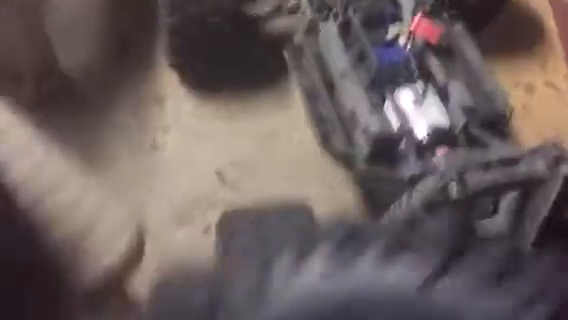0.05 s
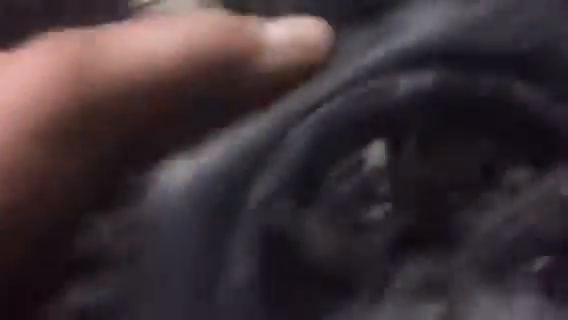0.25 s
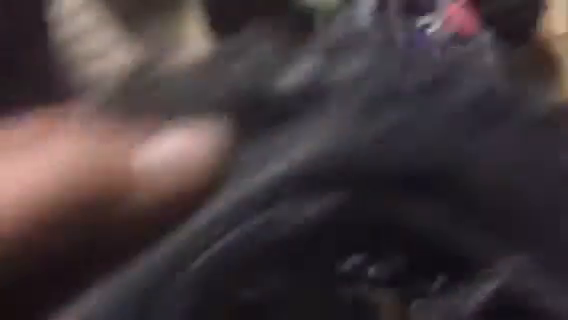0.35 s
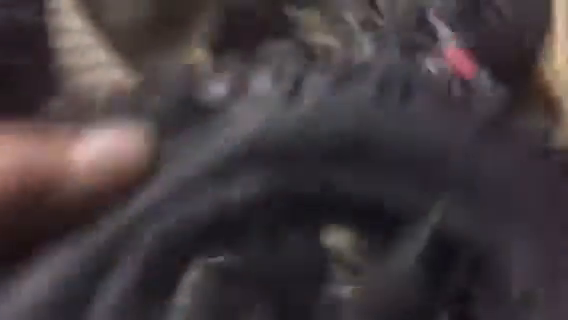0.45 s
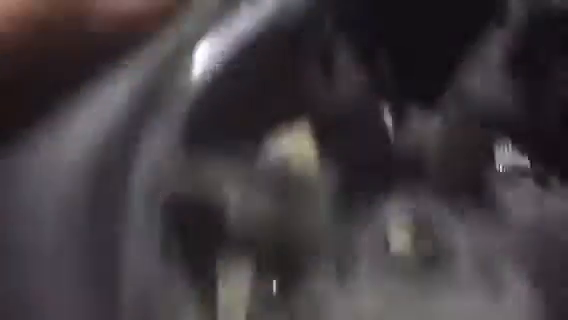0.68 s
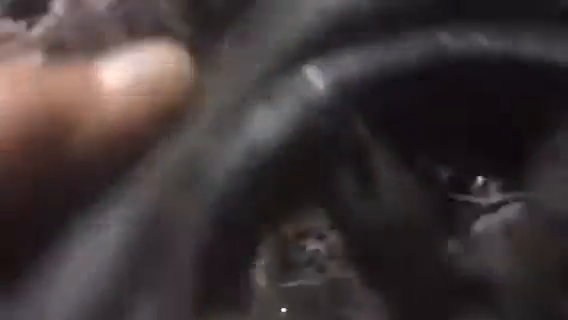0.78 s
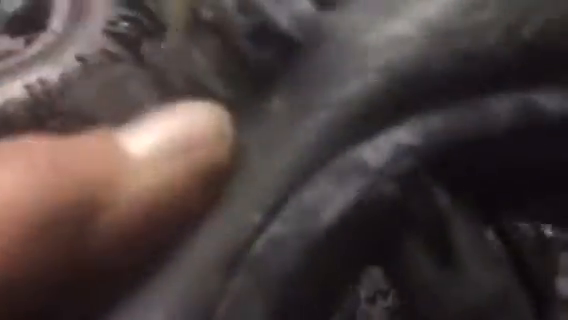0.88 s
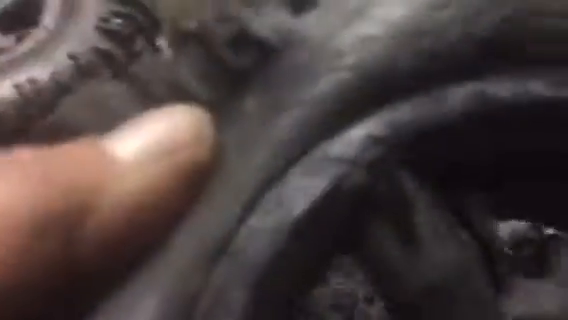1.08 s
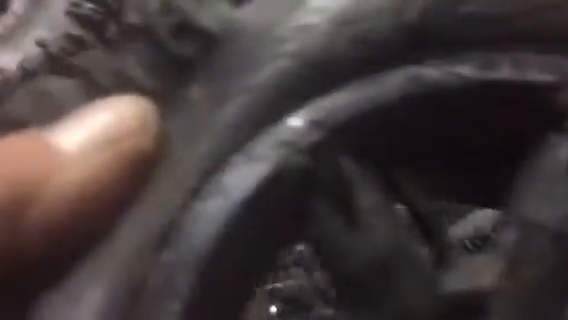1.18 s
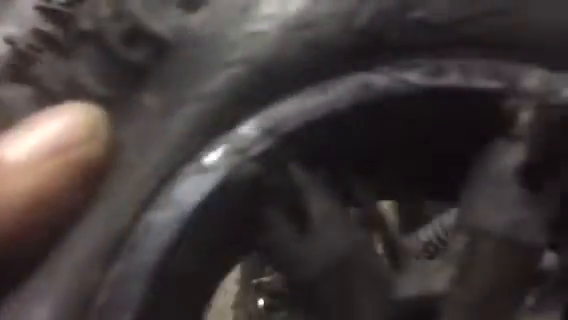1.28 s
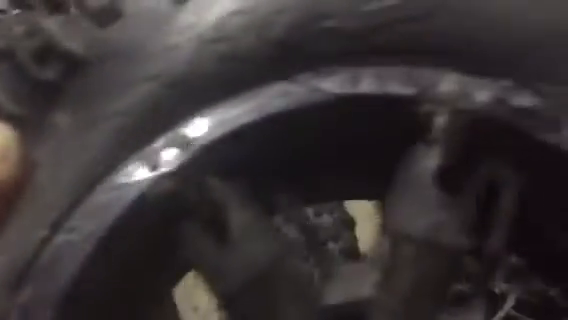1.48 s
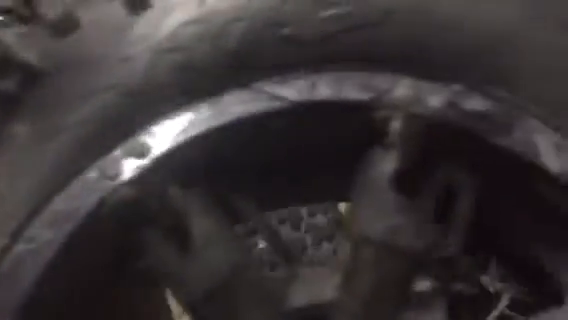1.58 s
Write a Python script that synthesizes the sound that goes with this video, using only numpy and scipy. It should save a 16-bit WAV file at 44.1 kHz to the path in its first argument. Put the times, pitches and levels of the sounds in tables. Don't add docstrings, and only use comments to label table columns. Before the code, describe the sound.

A rubber toy tire on a plastic wheel is turned by hand, close and dry indoors. Faint airy hum and low handling tremble run throughout. A hard, hissy rub with heavy thumps comes at 0.25-0.35 seconds, a lighter double stroke with a hollow knock at 0.5-0.65, a longer rub around 0.7-0.85, and an abrupt scratchy one from 0.9 to 1.1. Then only soft bumps and hum.

```python
import sys
import numpy as np
from scipy import signal
from scipy.fft import rfft, irfft
from scipy.io import wavfile
from scipy.ndimage import uniform_filter1d

SR = 44100
rng = np.random.default_rng(int(sys.argv[2]) if len(sys.argv) > 2 else 0)


def invert_db(level):
    return 10 ** (np.asarray(level, dtype=float) / 20)


def waveform_to_disk(signal):
    frames = np.transpose(np.atleast_2d(signal))
    scaled = np.clip(frames, -1, 1) * 32767
    samples = np.round(scaled).astype(np.int16)
    wavfile.write(sys.argv[1], SR, samples)


N = 72765


def rms_one(x):
    return x / np.sqrt(np.mean(x ** 2) + 1e-20)


def in_time(rows):
    s, *columns = np.transpose(rows)
    return [np.interp(np.arange(N) / SR, s, c) for c in columns]


def drift(rate_hz):
    r = np.exp(-2 * np.pi * rate_hz / SR)
    noise = rng.standard_normal(N + SR)
    return rms_one(signal.lfilter([1], [1, -2 * r, r * r], noise)[SR:])


def body(x, peaks, twice=False):
    out = 0
    for k, (hz, width, db) in enumerate(peaks):
        r = np.exp(-np.pi * width / SR)
        b = (1 - r * r) / 2 * np.array([1, 0, -1])
        a = [1, -2 * r * np.cos(2 * np.pi * hz / SR), r * r]
        y = signal.lfilter(b, a, x + 1e-18)
        if twice:
            y = signal.lfilter(b, a, y)
        out = out + (-1) ** k * invert_db(db) * y
    return out


def evened(x):
    power = uniform_filter1d(x ** 2, size=int(0.024 * SR))
    return rms_one(x / np.sqrt(power + 0.18 * np.mean(x ** 2)))


# t/s, level/dB, cupping/dB, drone/dB
AIR_LEVEL = [(0, -54, 0, -6.5), (.2, -55.5, 1.5, -2.5), (.36, -55.5, 11, -2), (.5, -57, 9.5, -0.5),
             (.56, -55, -8, 1.5), (.66, -61, 10.5, 1), (.87, -56, -1, -0.5), (1.15, -56.5, -13, -1),
             (1.27, -55.5, -5, 1.5), (1.4, -54.5, -7, -1.5), (1.65, -52, -12, -1.5)]
# f/Hz, width/Hz, level/dB
ROOM_HUM = [(395, 166, -5), (565, 260, -10.5), (1148, 67, -5), (1310, 98, -2.5), (1476, 124, -5.5),
            (1994, 170, -10), (2390, 270, -12.5), (3220, 430, -19)]
# f/Hz, width/Hz, level/dB
ROOM_DRONE = [(900, 170, 5.5)]
# f/Hz, width/Hz, level/dB
CUPPED_AIR = [(1613, 101, -2), (1820, 360, -5)]
# f/Hz, density/dB
MIC_HISS = [(300, -7), (2500, -6.5), (3300, -10.5), (4800, -9), (8000, -15), (15300, -21.5)]


def air():
    level_db, cup_db, drone_db = in_time(AIR_LEVEL)
    noise = rng.standard_normal(N)
    hum = 0
    for k, peak in enumerate(ROOM_HUM):
        swell = invert_db(1.2 * drift(4.4))
        hum = hum + (-1) ** k * body(noise, [peak], twice=True) * swell
    hum = hum + invert_db(drone_db) * body(rng.standard_normal(N), ROOM_DRONE, twice=True)
    cup = body(rng.standard_normal(N), CUPPED_AIR, twice=True) * invert_db(cup_db + 1.5 * drift(20.0))
    dull = signal.butter(1, 3500, fs=SR, output="sos")
    room = signal.sosfilt(dull, hum + cup) / np.std(hum)

    hz, db = np.transpose(MIC_HISS)
    f = np.maximum(np.arange(N // 2 + 1) * SR / N, 1)
    tilt = invert_db(np.interp(np.log(f), np.log(hz), db))
    hiss = irfft(rfft(rng.standard_normal(N)) * tilt, N)
    return invert_db(level_db) * room + invert_db(-70) * rms_one(hiss)


# t/s, level/dB, creak of the grip/dB
HAND_TREMOR = [(0, -42.5, -12.5), (.1, -40, -16), (.16, -38, -21), (.2, -31, -11.5), (.26, -31, -12.5),
               (.36, -34, -18.5), (.48, -37.5, -22.5), (.53, -34, -4), (.62, -37, -10), (.69, -37.5, -19),
               (.83, -36, -9), (.88, -42.5, -6.5), (.93, -32.5, -43), (1.14, -33, -27), (1.22, -37.5, -24),
               (1.27, -44, -5), (1.36, -38, -13.5), (1.42, -42, -15)]
# f/Hz, width/Hz, level/dB
CASE = [(40.7, 11, -5.5), (55.8, 27, -2), (85, 39, -7.5), (130, 36.6, -12.5)]
# f/Hz, width/Hz, level/dB
GRIP_CREAK = [(193, 93, 8), (318, 246, -1), (590, 282, -8.5)]


def tremor():
    level_db, creak_db = in_time(HAND_TREMOR)
    shake = body(rng.standard_normal(N + SR), CASE, twice=True)[SR:]
    shake = rms_one(evened(shake) * invert_db(2 * drift(5.6)))
    creak = body(rng.standard_normal(N), GRIP_CREAK, twice=True)
    creak = rms_one(creak * invert_db(3.0 * drift(30)))
    return invert_db(level_db) * (shake + invert_db(creak_db) * creak)


# t/s, level/dB, f/Hz, width/Hz
GRIT = [(0.129, -55.5, 1292, 70), (.188, -70, 8500, 2500), (0.2626, -54, 607, 500),
        (.4195, -66, 8950, 3540), (0.49, -67.5, 3100, 150), (.492, -66, 5500, 1500),
        (.512, -59, 3230, 1210), (.581, -35, 456, 298), (0.6007, -25, 445, 101), (0.614, -35, 452, 148),
        (.680, -56, 536, 302), (0.683, -65, 6000, 2000), (.707, -49, 540, 295.6), (0.7212, -39, 580, 302),
        (0.7227, -45, 2100, 900), (0.7751, -45.5, 1930, 500), (0.952, -43, 1684, 150),
        (1.037, -42, 1625, 200), (1.25, -70, 3530, 309), (1.424, -65, 9400, 3500)]


def ticks():
    out = 0
    for s, db, hz, width in GRIT:
        click = np.zeros(N)
        click[min(int(s * SR), N - 1)] = SR / (np.pi * width)
        out = out + np.e * body(click, [(hz, width, db)], twice=True)
    return out


# t/s, peak
# level/dB, # f/Hz
LOW_JOLTS = [(0.208, -22.5, 87), (0.225, -17, 100), (0.2685, -9, 157), (0.2786, -9, 96), (0.289, -17, 200),
             (0.295, -13, 72), (0.309, -17.5, 110), (0.338, -22, 150), (0.399, -16.5, 59),
             (0.514, -26, 415), (0.543, -19, 85), (0.558, -20, 65.5), (.584, -20.5, 280),
             (0.589, -17, 110), (0.626, -20, 66.7), (0.645, -24.5, 61), (0.676, -29, 64.5),
             (0.73, -16.5, 76), (0.745, -28, 91), (0.756, -25, 150), (.762, -24.5, 143), (0.779, -18, 75),
             (0.7983, -16, 98), (0.9081, -16.5, 220), (0.9113, -21, 196), (.924, -19, 110),
             (0.93, -34, 226), (0.941, -14, 69), (.976, -17, 110), (0.9952, -21.5, 200),
             (0.9996, -17.5, 200), (1.014, -24.5, 60), (1.033, -19, 79), (1.068, -19, 110),
             (1.0995, -18, 162), (1.108, -21, 130), (1.123, -21.5, 100), (1.261, -24.5, 74),
             (1.467, -27, 61), (1.599, -29.5, 73.5),
             (0.13, -33, 80), (0.451, -30, 130), (1.079, -20, 147), (1.276, -44.5, 134),
              (1.353, -32.5, 156), (1.64, -28, 74.5), (2, -38, 66), (.862, -47, 140), (.713, -28, 134),
              (1.6, -31, 92), (.69, -36, 104), (0.837, -27, 270), (0.851, -27, 90), (1.391, -34.5, 98)]


def jolts():
    rise_cycles, fall_cycles = 0.36, 0.6
    t, out = np.arange(N) / SR, 0
    for s, db, hz in LOW_JOLTS:
        cycles = (t - s) * hz
        rise = np.exp(-(cycles / rise_cycles) ** 2)
        fall = np.exp(-np.abs(cycles) / fall_cycles)
        shape = np.where(cycles < 0, rise, fall)
        out = out + invert_db(db) * shape * np.cos(2 * np.pi * cycles)
    return out


def slips():
    slips_per_s, spread_db, judder_db = 9000, 2, 1.5
    size = invert_db(spread_db * rng.exponential(1, N)) * rng.choice([-1, 1], N)
    happens = rng.random(N) < slips_per_s / SR
    return rms_one(size * happens * invert_db(judder_db * drift(40)))


# t/s, extra pressure/dB, length/s
KNOB_CATCHES = [(0.2832, 4.5, 0.0092), (0.29, -1, 0.0045), (0.312, 3, .006), (0.33, 1, 0.0049),
                (0.55, 11, 0.01), (0.595, 10.5, 0.006), (0.7314, 1, 0.0034), (0.734, 2.5, 0.0053),
                (0.7675, 5.5, 0.0042), (0.795, 3, 0.0053), (0.901, 14, 0.0057), (0.9264, 1, 0.0052),
                (.937, -2.5, 0.0072), (0.95, -5, .005), (0.99, 1, 0.0034), (1.004, 6.5, 0.015),
                (1.029, 5, 0.0033), (1.075, -5.5, 0.0026), (1.095, 5.5, 0.0064)]


def catches():
    t = np.arange(N) / SR
    return sum(db * np.exp(-((t - s) / length) ** 2) for s, db, length in KNOB_CATCHES)


# t/s, sliding speed/dB, pressure/dB
FINGER_SLIDES = [
    [(.245, -76, -10), (.262, -70, 6.5), (.268, -50, 0.5), (.302, -47, 4.5), (.32, -50, 3),
     (.324, -55, 3.5), (.342, -65, 1.5), (.37, -83, -10)],
    [(.508, -76, 12), (.532, -80, 6.5), (.539, -69, -2), (.558, -68, -3.5), (.566, -81, 7), (.582, -87, -3)],
    [(.575, -78, 4), (.59, -69, 1.5), (.604, -50, 5.5), (.617, -60.5, 13), (.624, -72.5, 5.5),
     (.645, -73, 13)],
    [(.67, -78, 2), (.683, -69.5, -3), (.719, -60.5, 4), (.724, -58.5, 4.5), (.75, -52.5, 2.5),
     (.797, -59.5, 3.5), (.805, -64.5, 8.5), (.845, -73, -1), (.885, -98, -15)],
    [(.901, -34, -19), (.906, -54.5, 1.5), (.924, -42, -0.5), (.95, -47, 4), (1.0, -54.5, -2),
     (1.045, -65, 3.5), (1.075, -57.5, 0.5), (1.12, -61, -0.5), (1.135, -82, 3)],
]
# tread hiss/dB, rim edge/dB, tire thud/dB, tire honk/dB, rim cup/dB
COLOURS = [
    (-2, -13, -23, -0.5, -3),
    (-14, -18, -11, -11.5, 0),
    (-3, -32, -44, -9, -0.5),
    (-8, -23, -10, -6, -3.5),
    (-10, -10, -5.5, -9, 1),
]
# t/s, level/dB
SIDEWALL_TOUCH = [(.25, 12), (.35, 7), (.52, 23), (.553, 22.5), (.57, 29), (.6, 7), (.7, -3), (.735, 8.5),
                  (.77, 15.5), (.8, 19), (.83, 15), (.88, 5), (.91, 5), (.95, -2), (1.0, -5), (1.04, -20),
                  (1.13, -14)]
# f/Hz, width/Hz, level/dB
SKIN_PEAKS = [(5240, 1050, 8.5), (6580, 2100, 6), (8330, 1520, -3), (9050, 890, 0), (11600, 1900, -10.5)]
SIDEWALL_PEAKS = [(3150, 720, 1), (4520, 2000, -17)]
TREAD_PEAKS = [(13100, 1700, -7)]
# f/Hz, width/Hz, level/dB
RIM_PEAKS = [(960, 384, 6), (1448, 200, 2), (2100, 467, 7)]
EDGE_PEAKS = [(2500, 400, 0), (2850, 350, -2)]
CUP_PEAKS = [(1725, 270, 0)]
# f/Hz, width/Hz, level/dB
THUD_PEAKS = [(60, 22, 0.82), (110, 120, 1.3), (200, 280, 12)]
HONK_PEAKS = [(250, 143, -2), (417.8, 87, 0), (500, 160, -4)]


def slides():
    rim_level_db, hollow_level_db = 8, 18
    hollow_follows = 0.65
    tread_grows = 0.14
    catch_hiss_share = 0.19
    t, out = np.arange(N) / SR, 0
    grain, knead = slips(), slips()

    skin = body(grain, SKIN_PEAKS, twice=True)
    wall = body(grain, SIDEWALL_PEAKS, twice=True)
    tread = body(grain, TREAD_PEAKS, twice=True)
    rim = rms_one(body(grain, RIM_PEAKS, twice=True))
    edge = rms_one(body(knead, EDGE_PEAKS, twice=True))
    cup = rms_one(body(knead, CUP_PEAKS, twice=True))
    thud = evened(body(knead, THUD_PEAKS, twice=True))
    honk = evened(body(knead, HONK_PEAKS, twice=True))
    skin = signal.sosfilt(signal.butter(3, 4400, "high", fs=SR, output="sos"), skin)

    wall_db, = in_time(SIDEWALL_TOUCH)
    catch_db = catches()
    for rows, (tread_db, edge_db, thud_db, honk_db, cup_db) in zip(FINGER_SLIDES, COLOURS):
        speed_db, press_db = in_time(rows)
        speed_db = speed_db + catch_hiss_share * catch_db
        press_db = press_db + (1 - catch_hiss_share) * catch_db
        touch = np.clip(np.minimum(t - rows[0][0], rows[-1][0] - t) / .006, 0, 1)
        tread_gain = invert_db(tread_db + tread_grows * (speed_db + 43))
        hiss = (skin + invert_db(wall_db) * wall + tread_gain * tread) / np.std(skin)
        wheel = rim + invert_db(edge_db) * edge + invert_db(cup_db) * cup
        hollow = invert_db(thud_db) * thud + invert_db(honk_db) * honk
        hollow_db = hollow_follows * (speed_db + press_db + 47) - 47.5 + hollow_level_db
        rub = invert_db(speed_db) * (hiss + invert_db(rim_level_db + press_db) * wheel)
        out = out + touch * (rub + invert_db(hollow_db) * hollow)
    return out


def scene():
    return (air() + tremor() + ticks() + jolts() + slides())[None, :]


def band_limit(x):
    return signal.sosfilt(signal.butter(12, 15340, fs=SR, output="sos"), x)


def record(dry):
    mix = signal.sosfilt(signal.butter(2, 30, "high", fs=SR, output="sos"), dry)
    return band_limit(mix)


dry = scene()
out = record(dry)
waveform_to_disk(out)
```